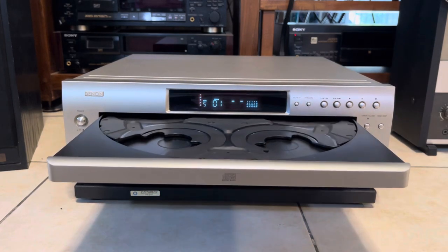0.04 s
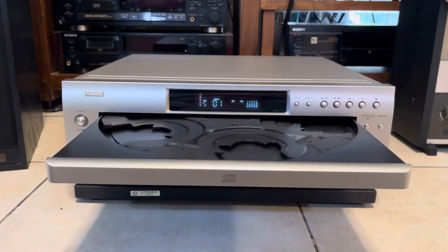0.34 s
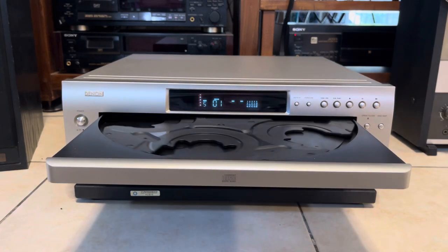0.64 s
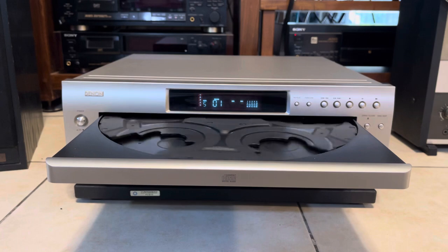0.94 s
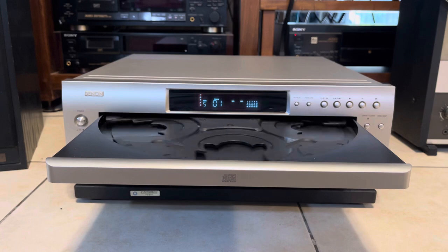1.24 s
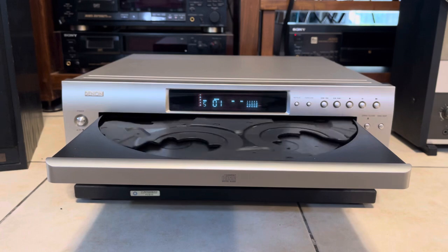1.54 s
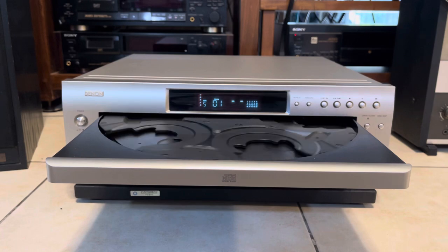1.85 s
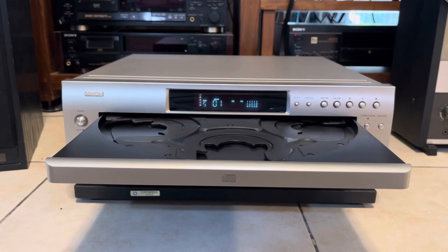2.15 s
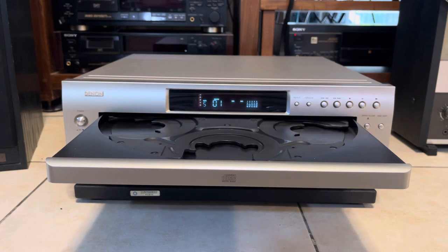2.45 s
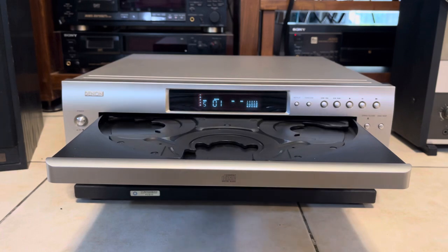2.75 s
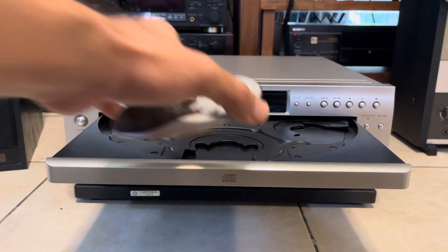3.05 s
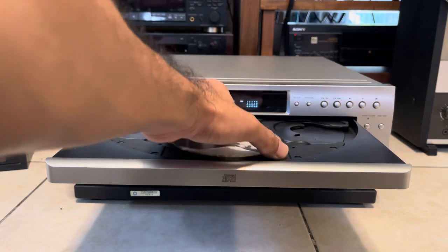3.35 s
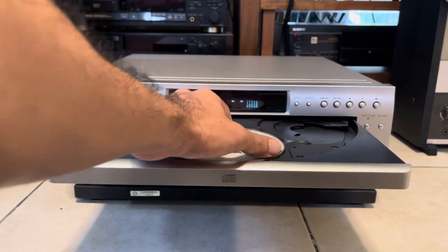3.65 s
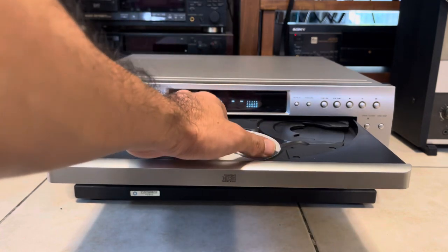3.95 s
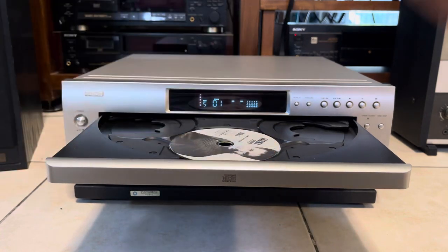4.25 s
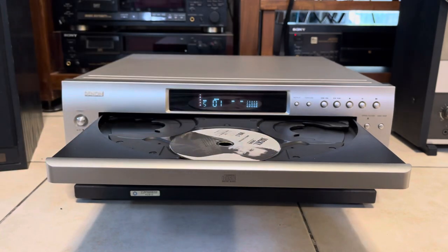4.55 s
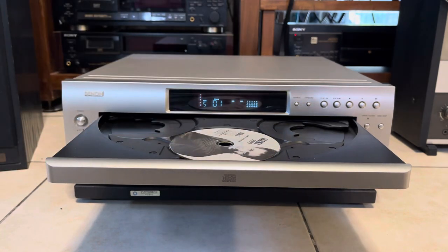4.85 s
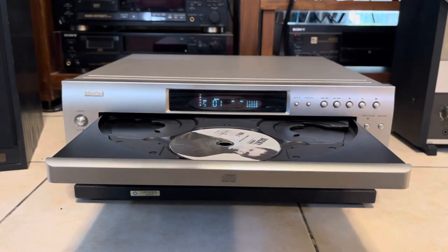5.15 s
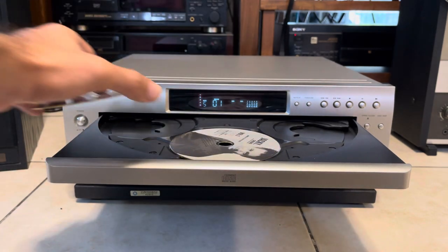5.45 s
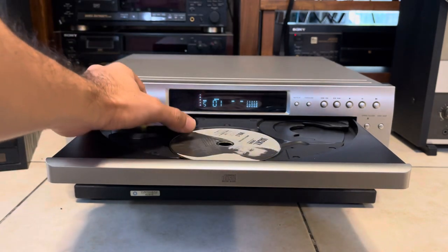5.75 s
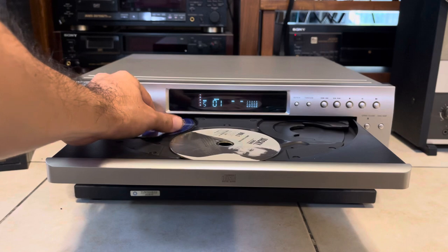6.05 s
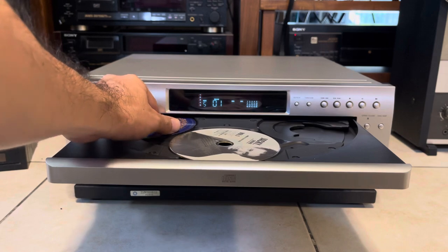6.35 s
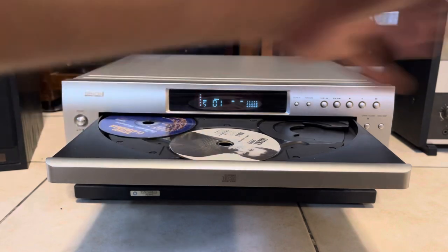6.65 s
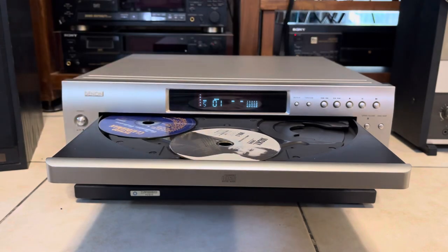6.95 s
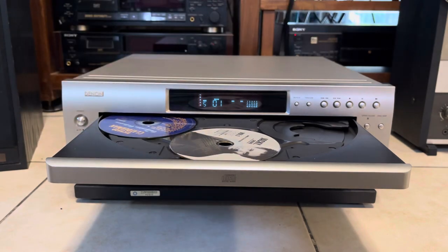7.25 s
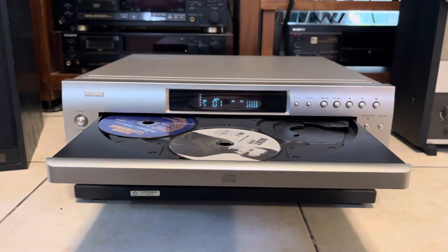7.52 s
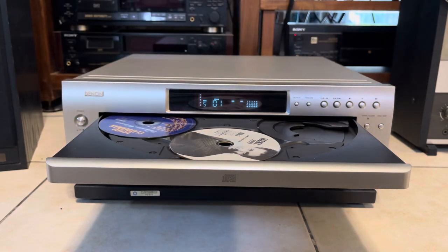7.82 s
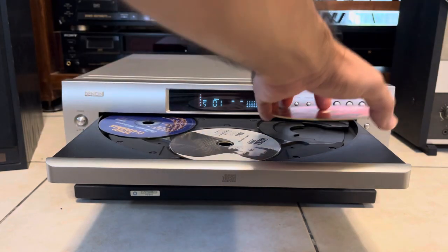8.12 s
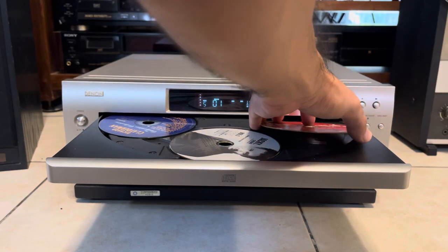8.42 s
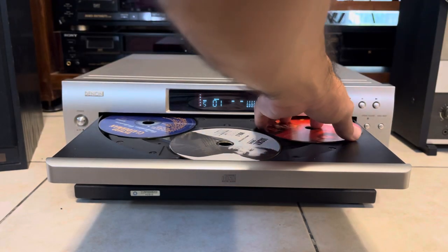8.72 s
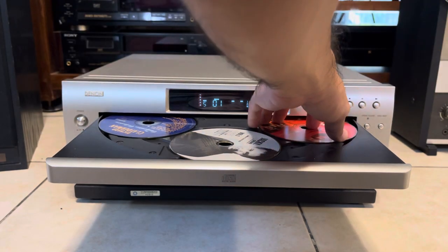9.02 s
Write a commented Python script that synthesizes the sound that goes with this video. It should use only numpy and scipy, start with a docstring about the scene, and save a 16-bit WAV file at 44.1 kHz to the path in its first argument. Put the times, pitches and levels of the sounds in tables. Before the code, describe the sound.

Close up in a small room, the platter of a disc changer grinds quietly and ticks as it goes round, then comes to rest. After a pause, a disc clatters lightly into the hollow plastic tray. A second and a third follow a couple of seconds apart, with brief scrapes and bright clicks, louder than the carousel. A low hum and a thin electronic whine continue underneath.

```python
"""Loading a disc changer

The carousel of a disc changer turns, rattling and ticking, and stops. A hand then lays three discs
into its plastic tray: each touches, skids and clacks into its well, ringing itself and the hollow
tray. Behind it a small tiled room hums, and running equipment whines faintly."""
import sys
import numpy as np
from scipy import signal
from scipy.fft import rfft, irfft
from scipy.io import wavfile
from scipy.ndimage import uniform_filter1d

SR = 44100
rng = np.random.default_rng(int(sys.argv[2]) if len(sys.argv) > 2 else 0)


def int16_out(signal):
    """Quantize to a 16-bit WAV file."""
    q = np.round(np.clip(np.atleast_2d(signal).T, -1, 1) * 32767)
    wavfile.write(sys.argv[1], SR, q.astype(np.int16))


N = 400428
RING_N = 16384  # samples in one short sound, such as a knock
TIME, RING_TIME = np.arange(N) / SR, np.arange(RING_N) / SR
STOP_S, COAST_S = 2.07, 0.045  # when the drive cuts out, and how quickly the platter comes to rest


def amp(db):
    """Turns decibels into a gain."""
    return 10 ** (np.asarray(db) / 20)


def unit_rms(x):
    """Scales a signal to an average strength (rms) of 1."""
    return x / np.sqrt(np.mean(x ** 2) + 1e-20)


def at_pitch(points, hz):
    """Reads a table between its rows, along a log-frequency axis."""
    f, value = np.transpose(points)
    return np.interp(np.log(hz + 1), np.log(f + 1), value)


def over_time(points):
    """Joins a table's rows into a curve as long as the scene."""
    return np.interp(TIME, *np.transpose(points))


def bins(size):
    """The frequencies in the spectrum of `size` samples."""
    return np.fft.rfftfreq(size, 1 / SR)


def add(mix, start, sound):
    """Mixes a sound in, `start` seconds from the beginning."""
    part = mix[:, round(start * SR):][:, :sound.shape[1]]
    part += sound[:, :part.shape[1]]


def wander(hz):
    """A random wobble of strength 1, mostly slower than `hz`."""
    return unit_rms(irfft(rfft(rng.standard_normal(N)) / (1 + (bins(N) / hz) ** 4), N))


def arch(start, length, t):
    """A smooth swell that rises and falls once."""
    return np.sin(np.pi * np.clip((t - start) / length, 0, 1))


def fade(t60, t=RING_TIME):
    """Dies away by 60 dB in `t60` seconds."""
    return np.exp(-np.log(1000) * t / t60)


def build_up(rise_s):
    """Climbs from 0 towards 1, about two thirds of the way in `rise_s`."""
    return 1 - np.exp(-RING_TIME / rise_s)


def nearness(hz, favoured_hz, reach):
    """How near a pitch lies to the favoured ones; `reach` is a share of the pitch."""
    return sum(1 / (1 + (np.log((hz + 1) / centre) / reach) ** 2) for centre in favoured_hz)


def resonances(hz, modes, boost_db, sharpness):
    """A gain with a peak at each mode, a pitch at which an object likes to ring."""
    return 1 + amp(boost_db) * sum(1 / (1 + (sharpness * (hz / mode[0] - 1)) ** 2) for mode in modes)


# how far the left channel runs ahead of the right: f/Hz, phase/rad
LEFT_LEAD = [(200, 0), (1500, .15), (3000, .8), (6500, .7), (8300, 1.7), (10300, 3.1), (11200, 4.5),
             (12000, 6)]
# how much louder the left channel is: f/Hz, level/dB
LEFT_BOOST = [(60, 1.2), (200, 2.2), (650, 3.5), (1400, 1), (4400, 4), (8000, 1), (12000, 0)]
def stereo(hz):
    """The gain and phase with which a pitch reaches left and right."""
    half = amp(at_pitch(LEFT_BOOST, hz) / 2) * np.exp(.5j * at_pitch(LEFT_LEAD, hz))
    return np.array([half, 1 / half])


# how alike left and right are for airy noise: f/Hz, likeness (1 = the same)
AIR_LIKENESS = [(100, 0.99), (290, 0.84), (640, 0.065), (1400, 0.39), (4000, 0.11), (10000, 0.085)]
# the same for the changer's knocks and rubs: f/Hz, likeness
CONTACT_LIKENESS = [(200, .96), (640, .88), (1500, .88), (4000, .8), (8000, .95)]
def noise_pair(size, likeness):
    """Left and right spectra of white noise, partly alike."""
    hz = bins(size)
    shared, separate = rfft(rng.standard_normal((2, size)))
    same = np.clip(at_pitch(likeness, hz), -1, 1)
    return np.array([shared, same * shared + np.sqrt(1 - same ** 2) * separate]) * stereo(hz)


def shaped_noise(gains, likeness):
    """Stereo noise of strength 1, coloured by one gain for each frequency."""
    return unit_rms(irfft(noise_pair(N, likeness) * gains, N))


# how long the room echoes: f/Hz, time to fade by 60 dB/s
ROOM_DECAY = [(150, 0.18), (600, 0.49), (2000, 0.27), (6000, 0.31), (11000, 0.16), (13500, 0.16)]
def room_echo(sound):
    """Sparse reflections off tiles and cabinets, each band dying at its own speed."""
    echoes = rng.standard_normal((2, SR // 2)) * (rng.random((2, SR // 2)) < .08)
    echoes[:, :round(.005 * SR)] = 0  # nothing comes back in the first 5 ms
    hz, t, bands = signal.stft(echoes, SR, nperseg=256)
    tail = signal.istft(bands * fade(at_pitch(ROOM_DECAY, hz)[:, None], t), SR, nperseg=256)[1]
    return signal.fftconvolve(sound, tail / np.linalg.norm(tail[0]), axes=1)[:, :N]


# tone of the room's air and hiss: f/Hz, relative level/dB
AIR_COLOUR = [(20, -45), (45, -12), (75, -3.5), (120, -3), (230, -7), (340, -16.5), (560, -22.5),
              (1000, -25.5), (1900, -29.5), (3000, -36), (5500, -40), (7700, -41), (9000, -29.5),
              (10700, -54.5), (11400, -61), (13000, -102)]
# humming notes: f/Hz, width/Hz, level/dB
HUM_NOTES = [(114.3, 3.5, -51), (170.6, 1.93, -53), (258.2, 20.3, -55), (815, 125, -56)]
# how the lowest note swells and sinks: t/s, relative level/dB
HUM_THROB = [(0.0, -54), (0.23, -56.5), (0.92, -41), (1.3, -56), (2.9, -41.5), (3.59, -55), (3.82, -41.5),
             (4.58, -64), (4.96, -49.5), (5.88, -55.5), (6.18, -48), (7.4, -57), (7.63, -48), (7.94, -53),
             (8.32, -49), (8.47, -47), (9.08, -58)]
def room_hum(air_db=-45):
    """Room air with a few wavering low notes, each a narrow band of noise."""
    hz = bins(N)
    out = amp(air_db) * shaped_noise(amp(at_pitch(AIR_COLOUR, hz)), AIR_LIKENESS)
    throb_db = over_time(HUM_THROB) - over_time(HUM_THROB).mean()
    for k, (centre, width, db) in enumerate(HUM_NOTES):
        note = shaped_noise(1 / (1 + ((hz - centre) / width) ** 2), AIR_LIKENESS)
        out += note * amp(db + throb_db * (k == 0))
    return out


def fan(hz=797, level_db=-62, sway_db=4.0, duck_db=-17):
    """One thin, wavering note, as from a cooling fan; it is weaker while the drive runs."""
    angle = 2 * np.pi * hz * TIME + wander(2.8)
    note = np.sqrt(2) * (stereo(hz)[:, None] * np.exp(1j * angle)).real
    driving = np.clip((STOP_S - TIME) / COAST_S, 0, 1)
    return amp(level_db + duck_db * driving + sway_db * np.tanh(wander(3.9))) * note


# the whine's main tones: multiple of the spin rate, base level/dB
WHINE_TONES = [(14, -79), (18, -71.5), (19, -78), (23, -71), (24, -77), (30, -77), (33, -79), (34, -80),
               (35, -84), (36, -66.5), (37, -83.5), (39, -83.5), (44, -91.5), (47, -69.5), (49, -76.5)]
# its other tones: f/Hz, base level/dB
WHINE_FILL = [(2500, -103), (5000, -91), (7500, -89.5), (9000, -85), (10200, -75), (10800, -78.5)]
# its slow swells: t/s, change of the lower tones/dB, change of the upper tones/dB
WHINE_SWELLS = [(0, -4, -1.5), (.5, -4.5, -3), (1.1, -2, 0.5), (1.9, -3.5, -1.5), (2.5, -4.5, -3),
                (3.1, -4.5, -1.5), (4.4, -2.5, -2.5), (5.2, -1, -3), (5.6, -3.5, -0.5), (6.5, -4, -0.5),
                (6.9, -3, -1.5), (7.6, -2.5, -2), (9.08, -1, -3)]
def whine(spin_hz=181.33, waver=0.00014, pulse_hz=13.25, pulse_db=4, flutter_db=3.5, drift_db=0.5):
    """High multiples of one slightly unsteady rotation; the higher ones pulse and flutter more."""
    turns = np.cumsum(spin_hz * (1 + waver * wander(25.0))) / SR
    flutter, drift = wander(40), wander(0.32)
    sway_db = pulse_db * np.cos(2 * np.pi * pulse_hz * TIME) + flutter_db * flutter
    main_db = {round(k): db for k, db in WHINE_TONES}
    lower_db, upper_db = (over_time(np.array(WHINE_SWELLS)[:, [0, column]]) for column in (1, 2))
    out = np.zeros((2, N))
    for k in range(14, 62):
        unrest = min(k / 36, 1) ** 2
        db = main_db.get(k, at_pitch(WHINE_FILL, k * spin_hz)) + (lower_db if k < 30 else upper_db)
        db += drift_db * np.roll(drift, rng.integers(N))  # shifted, so each tone moves on its own
        db += unrest * np.roll(sway_db, rng.integers(N))
        angle = 2 * np.pi * (k * turns + rng.random())
        angle += unrest * 0.7 * np.roll(flutter, rng.integers(N))
        sides = stereo(k * spin_hz)[:, None]
        out += np.sqrt(2) * amp(db) * abs(sides) * np.cos(angle + np.angle(sides))
    return out


def swish(start_s=6.975, length_s=.1, hz=11000, width_hz=900, level_db=-64):
    """A short, thin hiss between the second and third disc."""
    hiss = shaped_noise(1 / (1 + ((bins(N) - hz) / width_hz) ** 4), AIR_LIKENESS)
    return amp(level_db) * hiss * arch(start_s, length_s, TIME)


def grains(size, per_s=900, spread_db=2.5, grain_s=0.0018):
    """Spectra of tiny knocks of gear teeth and rim at random moments."""
    strengths = amp(spread_db * np.minimum(rng.exponential(1, size), 3))
    knocks = strengths * (rng.random(size) < per_s / SR)
    bursts = signal.lfilter([1], [1, -np.exp(-1 / (grain_s * SR))], knocks)
    return rfft(bursts * irfft(noise_pair(size, CONTACT_LIKENESS), size))


# where the platter rings, before the shift: f/Hz, width/Hz, relative level/dB
PLATTER_MODES = [(452, 104, 19), (545, 27, 13), (914, 70, 16), (1510, 82, 17), (3440, 44, -12),
                 (3800, 56, -8.5)]
# tone of the grinding gears: f/Hz, relative level/dB
GRIND_COLOUR = [(150, 3), (310, 9.5), (400, -3), (700, 7), (1200, -11), (2600, -9), (4200, -9.5),
                (6300, -15), (7400, -24), (10500, 2), (12500, -61), (15000, -60)]
def platter(size, shift):
    """Tiny knocks ring the platter, whose pitches are multiplied by `shift`."""
    hz = bins(size)
    body = 1 + sum(amp(db) / (1 + 2j * (hz - centre * shift) / width)
                   for centre, width, db in PLATTER_MODES)
    return unit_rms(irfft(grains(size) * body * amp(at_pitch(GRIND_COLOUR, hz)), size))


# the platter churns on its rollers: t/s, length/s, grind level/dB, rasp level/dB
RATTLE_SWELLS = [(0, 0.076, -50, -58), (.07, 0.14, -51, -69), (.205, 0.11, -48, -61),
                 (.28, 0.1, -49.5, -59.5), (.41, .14, -52.5, -59.5), (.57, 0.11, -53, -61),
                 (.64, 0.049, -57, -67), (.82, 0.095, -49, -67), (.955, 0.057, -48, -59),
                 (1.05, .11, -49.5, -59), (1.18, 0.074, -53, -58), (1.27, .06, -52, -66),
                 (1.35, 0.12, -52, -63), (1.41, 0.057, -51, -66), (1.49, 0.052, -51, -60),
                 (1.59, 0.068, -50, -58), (1.66, 0.076, -49.5, -71), (1.77, 0.042, -49.5, -57),
                 (1.88, 0.093, -49.5, -60), (1.978, 0.075, -48, -68)]
# tone of the rasping rollers: f/Hz, relative level/dB
ROLLER_COLOUR = [(1000, -18), (1900, -6.5), (2600, -5.5), (3100, -4), (4000, -23), (7000, -22),
                 (13000, -60)]
def gears(effort, rub_db=-35, pitch_scatter=0.056):
    """The rim rubs faintly; in short swells the platter grinds low and its rollers rasp."""
    out = amp(rub_db) * effort * platter(N, shift=0.69)
    for start, length, grind_db, rasp_db in RATTLE_SWELLS:
        shift = np.exp(pitch_scatter * rng.standard_normal())
        grit = grains(RING_N, per_s=330, spread_db=2.0, grain_s=0.0015)
        rasp = amp(rasp_db) * unit_rms(irfft(grit * amp(at_pitch(ROLLER_COLOUR, bins(RING_N) / shift))))
        grind = amp(grind_db) * platter(RING_N, shift)
        add(out, start, arch(0, length, RING_TIME) * (grind + rasp))
    return out


# the carousel's ticks: t/s, level/dB, treble/dB, ringing f/Hz, rise/s
CAROUSEL_TICKS = [(.004, -44.5, -0.5, 2700, .002), (.248, -45.5, -6, 4360, .003),
                  (0.308, -50.5, -6, 2900, 0.0028), (0.4518, -54, 15.5, 2600, .004),
                  (0.589, -61, 15, 4050, .004), (0.713, -51, 4, 4029, .002),
                  (0.8819, -42, 2.5, 4360, 0.00087), (.886, -43, 3, 1400, 0.0018),
                  (.976, -58, -6, 4330, .003), (1.052, -51, 0, 4240, .003), (1.182, -53.5, 9, 2800, .004),
                  (1.301, -49, 3, 3120, 0.0043), (1.419, -51, 4, 2700, .003), (1.508, -49.5, 5, 4200, .002),
                  (1.6794, -45, 10.5, 4000, 0.0012), (1.845, -46.5, -5, 4530, 0.0038),
                  (1.912, -62, -6, 2800, 0.0071)]
def ticks(muffle_hz=13500):
    """Small plastic clacks of the turning carousel, their top muffled by the casing."""
    out = np.zeros((2, N))
    for start, db, treble_db, hz, rise in CAROUSEL_TICKS:
        thud_db = -1 + 0.847 * (db + 48)  # harder ticks wake the tray more
        tick = clack(thud_db, treble_db, chatter_s=0.035, hollows_hz=[hz], hollow_db=6.5, reach=0.13)
        muffled = irfft(rfft(tick) / (1 + (bins(RING_N) / muffle_hz) ** 16))
        add(out, start, amp(db) * muffled * build_up(rise) * (1 - RING_TIME / RING_TIME[-1]))
    return out


# how hard the drive works: t/s, relative level/dB
DRIVE_EFFORT = [(0.0, -49), (0.07, -54), (0.25, -52), (0.65, -50.5), (0.75, -58), (0.85, -52.5),
                (1.26, -56), (1.39, -53), (2.02, -54.5)]
# tone of its rumble: f/Hz, relative level/dB
RUMBLE_COLOUR = [(60, -10), (240, -10.5), (540, 4), (700, -17), (930, -12), (1200, -10.5), (2500, -20),
                 (5000, -30), (9000, -22.5), (12000, -48), (15000, -78)]
def carousel(uneven_db=3, drive_db=-2):
    """The platter rumbles on its gears, rattles and ticks as it goes round, then stops."""
    coasting = np.exp(-np.maximum(TIME - STOP_S, 0) / COAST_S)
    effort = amp(drive_db + over_time(DRIVE_EFFORT)) * coasting
    rumble = shaped_noise(amp(at_pitch(RUMBLE_COLOUR, bins(N))), CONTACT_LIKENESS)
    unevenness = unit_rms(amp(uneven_db * np.tanh(wander(36))))
    return effort * rumble * unevenness + gears(effort) + ticks()


def skid_pressure(start, length, bite_s=0.013, swell_db=1, release_s=0.019):
    """The pressure of one skid: it bites, grows slightly and lets go."""
    t = np.maximum(TIME - start, 0)
    release = np.exp(-np.maximum(t - length, 0) / release_s)
    return np.minimum(t / bite_s, 1) * amp(swell_db * np.minimum(t / length, 1)) * release


# a disc's rim skids over the tray: t/s, length/s, level/dB
RIM_SKIDS = [(3.44, 0.21, -61), (3.796, 0.078, -64), (5.696, 0.063, -47.5), (5.78, 0.23, -54.5),
             (6.107, 0.17, -62), (8.43, 0.1874, -64), (8.574, 0.1, -44)]
# tone of the rubbing rim: f/Hz, relative level/dB
RIM_COLOUR = [(200, 2), (1200, 2), (1750, 6.5), (2400, 5), (3300, 1), (6000, -7), (9000, 2), (11500, 1),
              (13500, -47), (16000, -48)]
def skids(grain_db=-1.5):
    """Rims rub over the plastic in fine grains that wake the disc's modes."""
    body = resonances(bins(N), DISC_MODES, boost_db=-1, sharpness=78)
    rub = shaped_noise(amp(at_pitch(RIM_COLOUR, bins(N))) * np.sqrt(body), CONTACT_LIKENESS)
    pressure = sum(amp(db) * skid_pressure(start, length) for start, length, db in RIM_SKIDS)
    return rub * unit_rms(amp(grain_db * wander(700))) * pressure


def squeak(start_s=8.543, length_s=.022, hz=3650, level_db=-53):
    """The third disc's rim sticks and slips, making one very short note."""
    out, t = np.zeros((2, N)), np.arange(0, length_s, 1 / SR)
    note = (stereo(hz)[:, None] * np.exp(2j * np.pi * hz * t)).real
    add(out, start_s, amp(level_db) * note * arch(0, length_s, t))
    return out


def ring(modes, favoured_hz, reach, rise_s, detune, spread_rad, floor_db=-14.5):
    """Dying tones, strongest near the favoured pitches; each contact detunes them a little."""
    out = 0
    for hz, db, t60 in modes:
        pitch_chance, side_chance = rng.standard_normal(2)
        sides = stereo(hz) * np.exp(1j * spread_rad * side_chance * np.array([1, -1]))
        wave = np.exp(2j * np.pi * (hz * (1 + detune * pitch_chance) * RING_TIME + rng.random()))
        strength = amp(db) * (amp(floor_db) + nearness(hz, favoured_hz, reach))
        out = out + (sides[:, None] * wave).real * strength * fade(t60)
    return out * build_up(rise_s)


# where the tray rings: f/Hz, relative level/dB, time to fade by 60 dB/s
TRAY_MODES = [(253, 0.5, 0.18), (425.3, -6, 0.12), (548, -4, 0.12), (863, -5, 0.045)]
def tray_thud(favoured_hz):
    """The hollow tray answers a knock with a few low tones that start softly."""
    return ring(TRAY_MODES, favoured_hz, reach=0.028, rise_s=0.0042, detune=0.0053, spread_rad=0.037)


# where a disc rings: f/Hz, relative level/dB, time to fade by 60 dB/s
DISC_MODES = [(1139, -14, 0.027), (1610, -10.5, 0.064), (1775, -0.5, 0.045), (1872, -4, 0.041),
              (2460, -26, 0.038), (2730, -27, .04), (3170, -21, 0.032), (3360, -7, 0.018),
              (3630, -12, 0.033), (3890, -22, 0.026), (5150, -20, 0.02), (7960, -15, 0.037),
              (9010, 8, 0.042), (10960, -12, .04)]
def disc_ring(favoured_hz):
    """A knocked disc rings at once with short, bright tones."""
    return ring(DISC_MODES, favoured_hz, reach=0.064, rise_s=0.00032, detune=0.0085, spread_rad=0.1597)


# crowded modes of the plastic, by band: f/Hz, relative level/dB, rise/s, factor on the chatter time
PLASTIC_BANDS = [(130, -20, 0.011, 3.1), (272, -12.5, 0.025, 4.2), (576.6, -8, 0.0072, 1.46),
                 (980, -14.5, 0.0022, 3.33), (2040, -8, 0.00046, 2.26), (3480, -4.5, 0.00027, 1.23),
                 (5600, -7.5, 0.00034, 1.54), (7770, -0.5, 0.0002, 0.77), (10000, 2.5, 0.00016, 0.85),
                 (13000, -19, 0.00022, 0.35), (13700, -25, .0002, 0.44)]
def clack(thud_db, treble_db, chatter_s, hollows_hz, hollow_db=0, reach=0.033):
    """Tiny uneven contacts wake the plastic: the treble speaks at once, the heavy tray builds late."""
    hz = bins(RING_N)
    body = resonances(hz, TRAY_MODES + DISC_MODES, boost_db=3, sharpness=55)
    contacts = amp(3 * unit_rms(uniform_filter1d(rng.standard_normal(RING_N), size=40)))
    chatter = rfft(irfft(noise_pair(RING_N, CONTACT_LIKENESS)) * contacts) * body
    low_cut = hz ** 2 / (hz ** 2 + 90 ** 2)
    hollow_humps = 1 + amp(hollow_db) * nearness(hz, hollows_hz, reach)
    snap = amp(-23) * fade(0.015)
    centres, out = [row[0] for row in PLASTIC_BANDS], 0
    for (centre, db, rise, stretch), this_band in zip(PLASTIC_BANDS, np.eye(len(centres))):
        band = chatter * at_pitch(list(zip(centres, this_band)), hz) * low_cut
        noise = irfft(band * hollow_humps) / irfft(band).std()
        tilt_db = at_pitch([(450, thud_db), (1500, 0), (3000, 0), (8500, treble_db)], centre)
        out = out + amp(db + tilt_db) * noise * (fade(chatter_s * stretch) + snap) * build_up(rise)
    return out


# where a disc lands decides which pitches are favoured:
# from t/s, two tray f/Hz, two disc f/Hz, disc ring left over right/dB
LANDING_SPOTS = [(3.3, 372, 486, 1190, 2400, 7), (3.44, 259, 425, 1070, 1520, 9),
                 (3.58, 413, 430, 1230, 3430, 3), (3.75, 235, 280, 1280, 2370, 1),
                 (5.6, 524, 600, 1640, 2530, 5.5), (5.9, 253, 545, 1610, 8400, 7),
                 (6.07, 525, 620, 1700, 3170, 5), (7.5, 350, 500, 3170, 3160, 1),
                 (8.3, 525, 620, 1690, 1940, -4), (8.85, 265.4, 438, 2220, 2980, -3)]
# three discs touch, drop and settle, with one small click as the third disc is picked up: t/s, level/dB,
# thud/dB, treble/dB, ring/dB, base chatter time/s
DISC_KNOCKS = [ (3.346, -27.5, 7.5, -10, -4, 0.033), (3.404, -41.5, -10, -16, -5, 0.056),
               (3.434, -40, -4, -11, -9.5, 0.024), (3.472, -47, -3, -19, -5, .04),
               (3.4818, -30, -8, 5.5, 4, 0.055), (3.488, -27.5, -1.5, -8, -2, 0.037),
               (3.494, -32.5, 8, -2, -10, 0.082), (3.613, -39, -9, -16, -6, 0.096),
               (3.622, -33, -9, -5.5, -4, 0.07), (3.6344, -22.5, -8, -3, -1, 0.033),
               (3.642, -32, 7.5, -4, 0, 0.045), (3.795, -30, 0.5, -0.5, -8.5, 0.028),
               (5.698, -38, 6, 0, 2.5, .05), (5.926, -31, -3, 0.5, -16, 0.063),
               (5.943, -27, 0, 4.5, 2.5, 0.073), (5.955, -32.5, 9.5, 7, -9, 0.011),
               (6.114, -30, -5, -0.5, -8, 0.071), (6.123, -27.5, 9, 1, 4.5, 0.019),
               (6.132, -37.5, 9.5, 4, -6, 0.073), (6.15, -39.5, -11, 0, -5, 0.045),
               (6.169, -39, -6, -4, -4, 0.024), (6.418, -50.5, 17.5, -22.5, -21, 0.058),
               (6.617, -56, 3, -17, -10, .02), (7.6622, -48.5, 12, 13, 11, 0.01),
               (8.384, -46, 5, -4, -15, 0.086), (8.433, -47, 10, -22.5, -3, 0.12),
               (8.5637, -40.5, -4, -1, -18, 0.091), (8.589, -36, 1, -1, -15, 0.067),
               (8.601, -18.5, -5.5, 0.5, 2, 0.029), (8.609, -30.5, 4, 7, -4, 0.03),
               (8.615, -30, 5.5, -1, -8, 0.039), (8.6262, -25.5, -3, -0.5, -4, 0.027),
               (8.652, -33, 4.5, -2.5, -17, 0.046), (8.667, -46, 0, -9, -13, 0.025),
               (8.926, -26.5, 3, -1, 0, 0.04004), (8.9357, -28, 5, 0.5, -7, 0.054),
               (8.947, -40, 10, -2, -5, .03), (8.9585, -45, -8, -1, -6, .03)]
def discs(pitch_scatter=0.017, rise_share=0.034):
    """Each contact clacks and rings disc and tray; a glancing one starts slower and chatters longer."""
    out = np.zeros((2, N))
    for start, db, thud_db, treble_db, ring_db, chatter_s in DISC_KNOCKS:
        spot = max(sum(row[0] <= start for row in LANDING_SPOTS) - 1, 0)
        _, low_hz, high_hz, *disc_hz, pan_db = LANDING_SPOTS[spot]
        # each contact lands a little apart, which moves the favoured pitches
        disc_hz = np.array(disc_hz) * np.exp(pitch_scatter * rng.standard_normal(2))
        tray = amp(thud_db) * tray_thud([low_hz, high_hz])
        disc = amp(ring_db + pan_db * np.array([[.5], [-.5]])) * disc_ring(disc_hz)
        contact = amp(db) * build_up(rise_share * chatter_s)
        add(out, start, contact * (clack(thud_db, treble_db, chatter_s, disc_hz) + tray + disc))
    return out


def scene(echo_db=-12):
    """The changer close by, its reflections, and the steady background."""
    near = discs() + skids() + squeak() + swish() + carousel()
    return near + amp(echo_db) * room_echo(near) + room_hum() + fan() + whine()


def record(dry):
    """Cuts away the treble above 16500 Hz."""
    low_pass = signal.firwin(255, 16500, window=("kaiser", 9), fs=SR)
    return signal.oaconvolve(dry, low_pass[None], "same")


dry = scene()
out = record(dry)
int16_out(out)
```